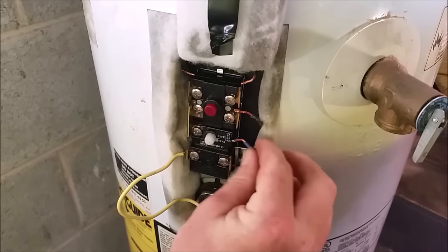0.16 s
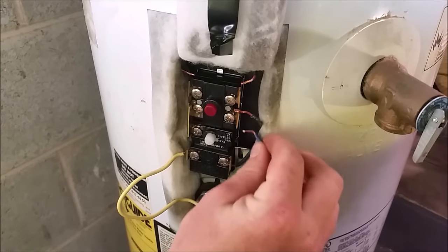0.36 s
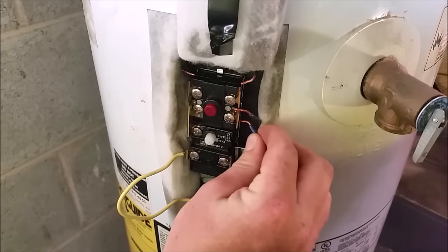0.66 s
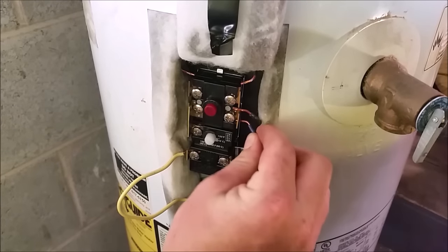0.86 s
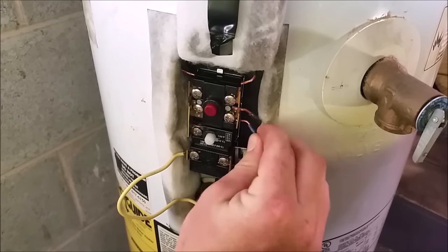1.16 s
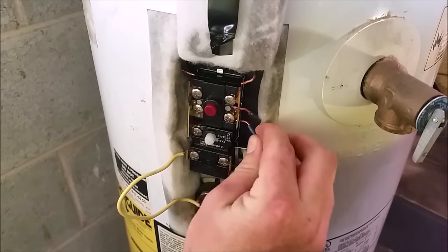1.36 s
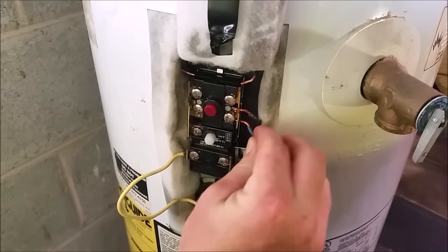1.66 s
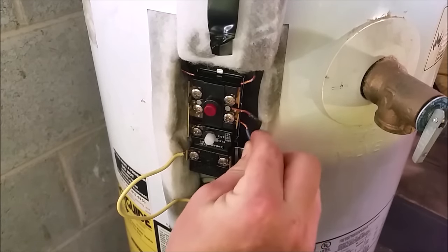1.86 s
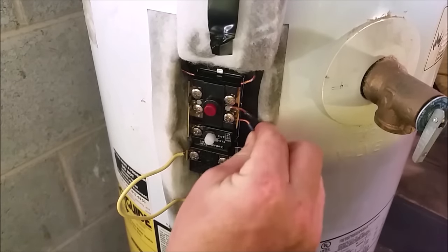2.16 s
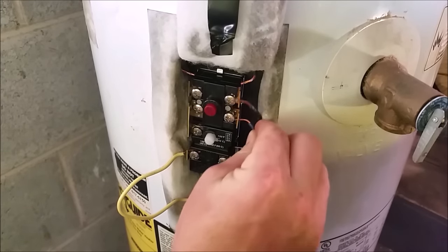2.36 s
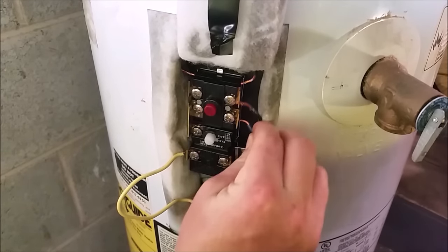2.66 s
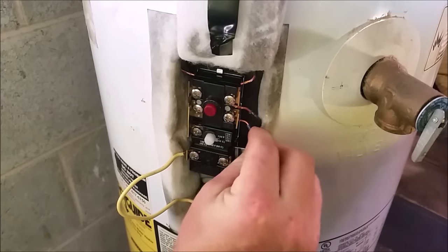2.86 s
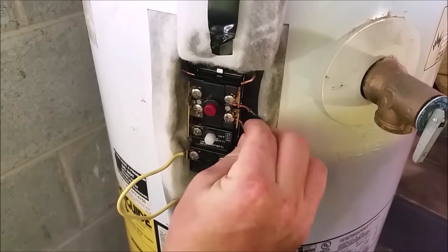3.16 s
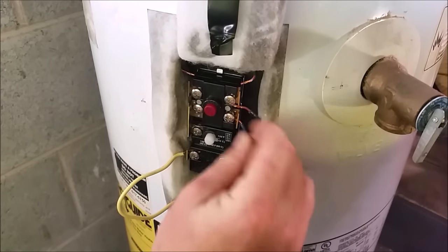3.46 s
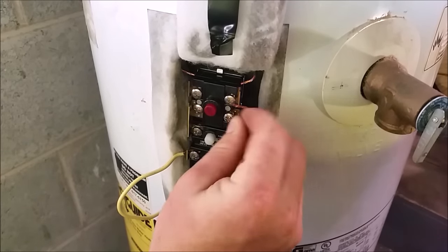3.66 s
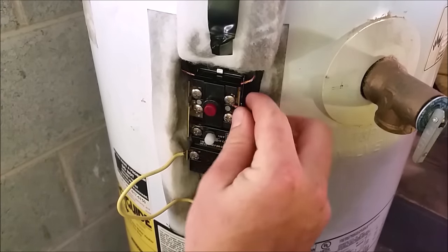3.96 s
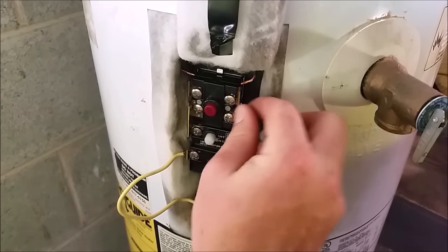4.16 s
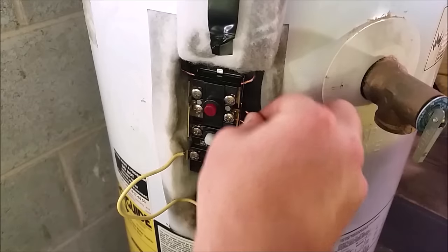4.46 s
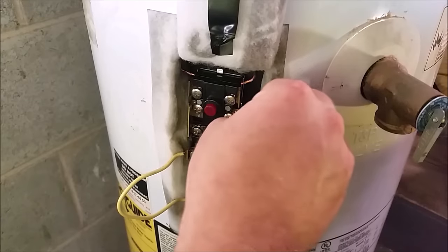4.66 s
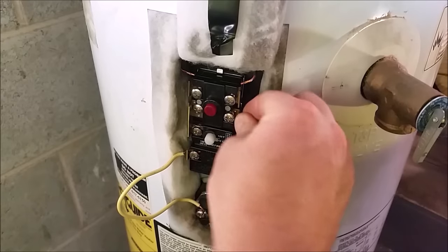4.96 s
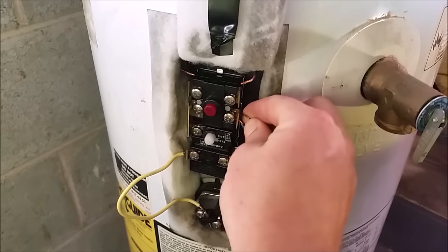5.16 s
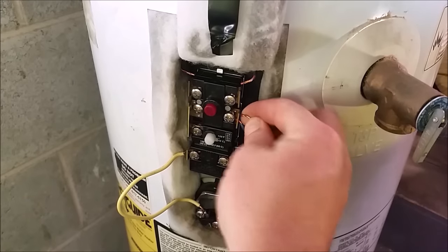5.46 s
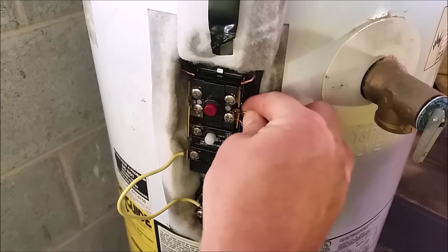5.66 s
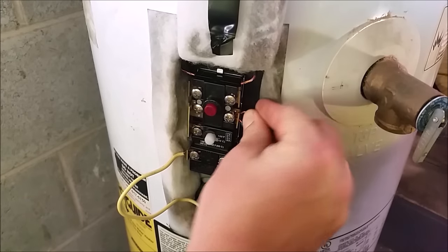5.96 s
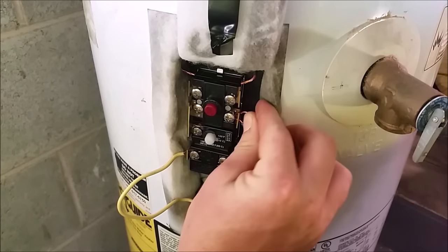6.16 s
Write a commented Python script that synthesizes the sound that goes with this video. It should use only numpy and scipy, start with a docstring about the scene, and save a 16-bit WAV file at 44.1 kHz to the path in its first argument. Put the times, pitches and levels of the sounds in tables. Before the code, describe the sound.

Fingers fiddle with stiff wires on metal terminal screws, giving sharp clicks, hollow plastic knocks and soft rubbing over a low wavering indoor hum.

```python
"""Fingers bend stiff wires on the terminal screws of a water heater's thermostat, close to the microphone.
Soft knocks and skin rubbing open; wire ends start to snap off the screws (noise crack, ringing modes) at 0.7 s.
The loudest snaps and knocks of plastic housing on steel jacket (damped modes, sagging thud) fall at 2.3-3.2 s.
Rubs and light knocks go on; snaps and thuds return at 5.2-5.6 s, then skids (runs of tiny slips) near 6.1 s.
Behind all of it a small masonry room holds a low wavering hum with rumble, and a thin steady hiss (noise bands)."""
import sys
import numpy as np
from scipy import signal
from scipy.fft import rfft, irfft, next_fast_len
from scipy.io import wavfile
from scipy.ndimage import uniform_filter1d, map_coordinates

SR = 44100
rng = np.random.default_rng(int(sys.argv[2]) if len(sys.argv) > 2 else 0)


def master_out(mix):
    """Clip the mix to full scale and print it as 16-bit PCM to the path in sys.argv[1]."""
    frames = np.transpose(np.atleast_2d(mix))
    ceiling = np.clip(frames, -1, 1)
    pcm = np.round(ceiling * 32767).astype(np.int16)
    wavfile.write(sys.argv[1], SR, pcm)


N = 278271


def amp(db):
    """Decibels to gain."""
    return 10 ** (np.asarray(db) / 20)


def unit(x):
    """Scale to rms 1."""
    return x / np.sqrt(np.mean(x ** 2) + 1e-20)


def along(points, hz):
    """Read (Hz, value) points on a log frequency axis."""
    f, v = np.transpose(points)
    return np.interp(np.log(hz + 1), np.log(f + 1), v)


def curves(rows):
    """One value per sample for each column after the time."""
    s, *columns = np.transpose(rows)
    return [np.interp(np.arange(N) / SR, s, column) for column in columns]


def filtered(x, response):
    """Apply a frequency response to x."""
    n = x.shape[-1]
    fft_len = next_fast_len(n + SR // 8)
    spectrum = rfft(x, fft_len) * response(np.fft.rfftfreq(fft_len, 1 / SR))
    return irfft(spectrum, fft_len)[..., :n]


def noise(spectrum, shape):
    """Noise of rms 1 with the given colour."""
    return unit(filtered(rng.standard_normal(shape), lambda hz: amp(along(spectrum, hz))))


def wobble(rate):
    """Smooth random curve, rate knots a second."""
    knots = rng.standard_normal(int(N * rate / SR) + 4)
    return map_coordinates(knots, [np.arange(N) * rate / SR])


def spread(pair, alike, left_db):
    """Mix two unrelated signals to a pair of correlation alike, left louder by left_db, rms 1."""
    turn = np.arccos(np.clip(alike, -1, 1)) / 2
    mid = np.cos(turn) * pair[0]
    side = np.sin(turn) * pair[1]
    return unit(np.array([(mid + side) * amp(left_db), mid - side]))


def add(track, s, sound):
    """Mix a sound into a track at time s."""
    start = max(round(s * SR), 0)
    part = track[..., start:start + sound.shape[-1]]
    part += sound[..., :part.shape[-1]]


def fade(t, attack, t60):
    """Quick rise times exponential decay of 60 dB in t60 seconds."""
    return (1 - np.exp(-t / attack)) * np.exp(-np.log(1000) * t / t60)


def ring(modes, t, attack, detune, pitch=1):
    """Damped modes; each contact point gives them new strengths and slightly new pitches."""
    hz, db, t60 = np.transpose(modes)[:, :, None]
    size, shift, phase = rng.standard_normal((3, len(modes), 1))
    mode_hz = pitch * hz * (1 + detune * shift)
    waves = np.sin(2 * np.pi * (mode_hz * t + phase))
    gains = amp(db + 1.8 * size)
    return np.sum(gains * waves * fade(t, attack, t60), axis=0) / np.linalg.norm(gains)


# Decay of the room tail. Each row: frequency in Hz, t60 in s.
ROOM_T60 = [(200, 0.35), (1000, 0.25), (5000, 0.59), (15000, 0.22)]
ECHO_LUMP_DB, ECHO_MERGE_S = 7, 0.042  # initial unevenness of the echoes, time constant of its decay


def in_room(pair, wet_db):
    """Add a diffuse tail from the block walls, different in each channel."""
    hz, t, z = signal.stft(rng.standard_normal((2, SR // 2)), SR, nperseg=256)
    decay = fade(t, 0.0006, along(ROOM_T60, hz)[:, None])
    tail = signal.istft(z * decay, SR, nperseg=256)[1]
    # first echoes stand apart, from nearby surfaces, then merge
    lumps = unit(uniform_filter1d(rng.standard_normal(tail.shape), SR // 1500, axis=1))
    merge = np.exp(-np.arange(tail.shape[1]) / SR / ECHO_MERGE_S)
    tail = tail * amp(ECHO_LUMP_DB * lumps * merge)
    wet = signal.fftconvolve(pair, tail / np.linalg.norm(tail[0]), axes=1)
    return pair + amp(wet_db) * wet[:, :pair.shape[-1]]


# Wire ends snapping off screws. Each row: start in seconds, relative level in dB, sharpness in dB,
# pitch of the free wire end in Hz, its ring over the crack in dB.
SNAPS = [(0.715, -61, 2, 7100, -3), (0.811, -63.5, -13, 7900, -7), (0.915, -66, -6, 6900, 3),
         (1.018, -41, 14.5, 11500, -12), (1.048, -51, 12.5, 6950, 1), (1.231, -43.5, 9.5, 11700, 0),
         (1.358, -60, 12, 7010, -16), (1.9659, -73, 7, 8650, 8), (2.025, -63, -5, 7500, -4),
         (2.043, -66, 3, 7200, -4), (2.1954, -62.5, 4, 11200, -3), (2.3099, -34.5, 7, 3880, 4.5),
         (2.3113, -41, 2, 5160, 8), (2.3149, -41, -3, 5150, 4), (2.631, -52, 5, 7200, -6),
         (2.688, -60.5, 8.5, 11380, -10), (2.8965, -57.5, 0, 7600, -16), (2.9833, -32.5, 9.5, 5140, -9),
         (3.104, -38, 4, 5040, 8.5), (3.1179, -32.5, 5, 5080, 4), (3.133, -48.5, 2, 7190, -1),
         (3.15, -49, 9, 11000, -8), (3.165, -56, 4, 6640, -7), (3.511, -64, 4, 8500, -1),
         (4.237, -68, 4, 7800, -7), (4.479, -66, 19, 11600, -4), (4.8967, -56, -6, 7190, -7),
         (5.2465, -60, -6, 7000, -7), (5.3946, -53, -2, 6730, -10), (5.4023, -54, 0, 7400, -9),
         (5.4062, -44, -8, 4880, 2), (5.4155, -46.5, 3.5, 2450, 1.5), (5.576, -63, 8, 7160, -7),
         (5.8555, -63, 0, 7220, -1), (6.189, -67, 6, 7850, -3), (6.1952, -64, 6, 7360, -1)]


def clicks():
    """Every snap of a wire end off its screw."""
    out = np.zeros((2, N))
    for s, db, sharp_db, wire_hz, wire_db in SNAPS:
        add(out, s, click(db, sharp_db, wire_hz, wire_db))
    return out


# Colour of the crack before sharpness. Each row: frequency in Hz, relative level in dB.
CRACK_SPECTRUM = [(500, 9), (2000, -6), (2800, -2), (4500, 4), (6300, -5), (7400, -5), (8800, -3),
                  (10000, -5.5), (11200, 3.5), (12500, -1.5), (16000, 4.5)]
# Wire end and screw. Each row: mode in Hz, relative level in dB, t60 in s.
SCREW_MODES = [(2460, -20, 0.11), (2960, -10, 0.029), (3720, 0.5, 0.022), (3940, -14, 0.068),
               (4440, -10, 0.031), (4800, -4.5, 0.032), (5140, 2, 0.019)]
# Bright overtones of the bare copper. Each row: mode in Hz, relative level in dB, t60 in s.
COPPER_MODES = [(6760, -3, 0.046), (7170, -1, 0.049), (7800, -1, 0.044), (8050, -10.5, 0.05),
                (10070, -25, 0.045), (10900, -2.5, 0.032)]
SCREW_DB, SCREW_LOSS_DB_PER_DB = -0.5, 1  # screw ring over the crack, its loss per dB of sharpness


def click(db, sharp_db, wire_hz, wire_db):
    """Wire end lets go: crack of a few ms, short metal ring, scatter off hand and jacket."""
    t = np.arange(SR // 3) / SR
    # sharper contact: more top octave, less screw ring
    colour = [(hz, level + np.interp(hz, [8000, 13000], [0, sharp_db - 12.5]))
              for hz, level in CRACK_SPECTRUM]
    # wire chatters over the thread, so the scatter is uneven
    chatter = unit(amp(10.0 * noise([(300, -12), (900, 9), (2000, -52)], len(t))))
    scatter = amp(-14.5) * chatter * fade(t, 0.0016, 0.11)
    crack = noise(colour, (2, len(t))) * (fade(t, 0.00042, 0.015) + scatter)
    overtones = amp(-13.5) * ring(COPPER_MODES, t, attack=0.00071, detune=0.0011)
    screw_gain = amp(SCREW_DB - SCREW_LOSS_DB_PER_DB * sharp_db)
    screw = screw_gain * ring(SCREW_MODES, t, attack=0.0009, detune=0.0088)
    # free end's pitch depends on where the fingers hold it
    wire = amp(wire_db) * np.sin(2 * np.pi * wire_hz * t) * fade(t, 0.001, 0.016)
    return amp(db + 1.0) * (in_room(crack, wet_db=-10.0) + wire + overtones + screw)


# Pushes and slips that shake the housing. Each row: start in seconds, relative strength in dB,
# hardness in dB over the strength, thud in dB over the strength, contact pitch in Hz, thud t60 in s.
HOUSING_KNOCKS = [(0.195, -62, 2, -3, 1140, 0.05), (0.641, -61, -3, -6, 1080, 0.05),
                  (1.004, -61.5, -2, 16, 800, 0.029), (1.677, -70.5, 15, 29.5, 1020, 0.026),
                  (1.719, -76, 18.5, -10, 1220, 0.032), (1.993, -59.5, 13, -3, 1100, 0.03),
                  (2.003, -64, 14, 12, 1200, 0.03), (2.012, -55.5, 14, 16, 1120, 0.024),
                  (2.024, -56.5, 17, 22, 1110, 0.021), (2.042, -60.5, 18, 13, 1150, 0.025),
                  (2.204, -67.5, 19, 8, 820, 0.06), (2.291, -58.5, 12, -2, 1150, 0.038),
                  (2.3103, -51.5, 13, 4, 900, 0.051), (2.319, -51.5, 16.5, 9, 980, 0.16),
                  (2.334, -58, 4, 11, 560, 0.18), (2.361, -51.5, 2, -1, 981, 0.081),
                  (2.716, -57.5, 15, -8, 810, 0.05), (2.984, -54.5, 10, -1, 1090, 0.06),
                  (3.107, -50, 4, -12, 1100, 0.05), (3.1215, -52, 13, -18, 1860, 0.05),
                  (3.1245, -47.5, 14, -22, 1270, 0.043), (3.131, -50, 14.5, -14, 1100, 0.073),
                  (3.3, -55.5, 7.5, 0, 740, 0.05), (3.351, -53, 4, -12, 1124, 0.045),
                  (3.462, -58.5, 5, -4, 907, 0.05), (3.512, -56.5, 4, -1, 752, 0.09),
                  (3.69, -63, 6, -5, 744, 0.051), (3.808, -66, 11, -6, 1270, 0.05),
                  (4.017, -64, 12.5, -4, 1000, 0.045), (4.235, -70, 14, -8, 1120, 0.04),
                  (4.555, -57, 7, -2, 710, 0.05), (4.89, -59, -9, 6, 905, 0.06),
                  (4.995, -67, 8, -3, 900, 0.05), (5.022, -67.5, 9, 0, 990, 0.05),
                  (5.244, -58, 16, -6, 1050, 0.054), (5.261, -55.5, -3, -3, 970, 0.078),
                  (5.408, -60, 12, 10, 1120, 0.1), (5.414, -55, 8, 5, 840, 0.22),
                  (5.428, -48.5, -5, 1.5, 588, 0.25), (6.049, -58, -13, 4, 930, 0.067)]


def knocks():
    """Single pushes and slips against the housing."""
    out = np.zeros((2, N))
    for s, db, hard_db, thud_db, contact_hz, thud_s in HOUSING_KNOCKS:
        add(out, s, knock(db, hard_db, thud_db, contact_hz, thud_s))
    return out


# Colour of the dead blow. Each row: frequency in Hz, relative level in dB.
BLOW_SPECTRUM = [(150, -13), (400, 2.5), (650, -6), (1200, -2), (1600, -5), (2100, -22.5), (4000, -15.5),
                 (8000, -46)]
# Colour of the slower boom. Each row: frequency in Hz, relative level in dB.
BOOM_SPECTRUM = [(200, -40), (430, 2.5), (600, 0), (850, -0.5), (1400, -17), (2200, -20), (5000, -38.5)]
# Steel jacket under the housing. Each row: mode in Hz, relative level in dB, t60 in s.
JACKET_MODES = [(306.6, -1, 0.19), (383.4, -4.5, 0.39), (447.6, 1, 0.3), (509, -3, 0.25), (586.6, 6, 0.26),
                (870, -8.5, 0.09), (1007, -12, 0.17), (1095, -7, 0.17), (1306, -5.5, 0.14),
                (1610, -15.5, 0.15)]
CONTACT_SCATTER = 0.025  # relative spread of the housing's pitches
THUD_HZ, THUD_SAG_HZ, THUD_SAG_S = 295, 108.4, 0.018  # final pitch, extra at start, settling time constant


def knock(db, hard_db, thud_db, contact_hz, thud_s):
    """Plastic housing knocks dead, steel jacket answers deeper, thud sags as the push relaxes."""
    t = np.arange(SR // 2) / SR
    blow = amp(-7.5) * noise(BLOW_SPECTRUM, (2, len(t))) * fade(t, 0.00089, 0.046)
    housing_modes = [(1, 0, 0.031), (1.27, -1, 0.014)]  # ratio to contact_hz, dB, t60 s
    plastic = amp(-2.5) * ring(housing_modes, t, attack=0.00023, detune=CONTACT_SCATTER, pitch=contact_hz)
    boom = noise(BOOM_SPECTRUM, (2, len(t))) * fade(t, 0.0039, 0.16)
    steel = amp(0.5) * ring(JACKET_MODES, t, attack=0.0014, detune=0.0038)
    cycles = np.cumsum(THUD_HZ + THUD_SAG_HZ * np.exp(-t / THUD_SAG_S)) / SR
    thud = amp(-1.5) * np.sin(2 * np.pi * (cycles + rng.random())) * fade(t, 0.00061, thud_s)
    dry_knock = amp(hard_db) * (blow + plastic) + boom + steel + amp(thud_db) * thud
    return amp(db) * in_room(dry_knock, wet_db=-3.5)


# Strokes of the fingers along the wire. Each row: start in seconds, length in seconds,
# dull rubbing in relative dB, fine scratching in relative dB.
FINGER_STROKES = [(0.376, 0.29, -71, -101), (0.702, 0.61, -73, -89), (1.878, 0.38, -70.5, -87.5),
                  (2.423, 0.52, -69.5, -86.5), (2.998, 0.53, -69.5, -88), (3.463, 0.42, -69.5, -93),
                  (4.353, 0.7, -79.5, -93.5), (5.265, 0.4, -77.5, -93.5), (5.804, 0.2, -69.5, -88),
                  (6.001, 0.33, -67.5, -85.5)]
BUMP_GAP_S, BUMP_DB, BUMP_SCATTER_DB = 0.15, 2, 6.5  # mean spacing, level over rubbing, its spread


def bumps():
    """Fingertips nudge the housing at random during strokes, harder in a firmer stroke."""
    out = np.zeros((2, N))
    for start, length, rub_db, _ in FINGER_STROKES:
        for place in rng.random(round(length / BUMP_GAP_S)):
            db = rub_db + BUMP_DB + BUMP_SCATTER_DB * rng.standard_normal()
            contact_hz = 1000 * np.exp(0.25 * rng.standard_normal())
            bump = knock(db, hard_db=0, thud_db=-14.5, contact_hz=contact_hz, thud_s=0.022)
            add(out, start + place * length, bump)
    return out


SLIP_SCATTER_DB = 0.5


def slip(db, hz, t60):
    """One tiny slip: a few cycles of a damped tone, of random size."""
    t = np.arange(SR // 30) / SR
    gain = amp(db + SLIP_SCATTER_DB * rng.standard_normal())
    return gain * np.sin(2 * np.pi * hz * t) * fade(t, 0.00052, t60)


def skids(rows, rate, pitch_scatter, rise, t60):
    """Dense uneven runs of slips swell and fade; pitch climbs as the contact speeds up."""
    out = np.zeros((2, N))
    for start, length, db, hz in rows:
        count = round(length * rate)
        for size, place in zip(rng.standard_normal(count), rng.random(count)):
            slip_hz = hz * np.exp(pitch_scatter * size + rise * (place - 0.5))
            envelope = np.sin(np.pi * place)
            add(out, start + place * length, envelope * slip(db, slip_hz, t60))
    return in_room(out, wet_db=-3.0)


# Fingertips skidding on insulation. Each row: start in seconds, length in seconds,
# relative level of a slip in dB, centre pitch in Hz.
FINGERTIP_SKIDS = [(0.17, 0.06, -63, 1090), (0.64, 0.073, -61, 1160), (1.992, 0.052, -49, 1160),
                   (2.33, 0.067, -52, 700), (3.12, 0.047, -54, 1840), (3.58, 0.16, -60, 716),
                   (3.638, 0.059, -59, 1130), (3.786, 0.06, -58.5, 1340), (4.541, 0.052, -60, 1270),
                   (5.82, 0.18, -72, 1350), (6.04, 0.1, -64, 756), (6.065, 0.066, -54, 1530),
                   (6.185, 0.045, -55, 870), (6.2, 0.15, -60.5, 1500), (6.24, 0.07, -56, 680)]
# Bare copper grazing a screw. Each row: start in seconds, length in seconds,
# relative level of a slip in dB, centre pitch in Hz.
COPPER_GRAZES = [(0.705, 0.046, -67, 7300), (0.77, 0.065, -65, 7700), (0.85, 0.099, -75, 6900),
                 (2.005, 0.038, -64, 7460), (2.185, 0.065, -65, 10450), (2.615, 0.06, -63, 8000),
                 (3.2, 0.17, -84, 7440), (4.36, 0.046, -69, 7600), (4.88, 0.057, -69, 7200),
                 (5.222, 0.02, -66, 7130), (5.56, 0.06, -69, 7200), (6.05, 0.074, -67, 10000)]
SCRAPE_SLIPS_PER_S, GRAZE_SLIPS_PER_S = 320, 550


def scrapes():
    """Fingertips skid on insulation with a faint rising squeak; copper grazes screws in fine grains."""
    fingertip = skids(FINGERTIP_SKIDS, SCRAPE_SLIPS_PER_S, pitch_scatter=0.11, rise=0.2, t60=0.014)
    copper = skids(COPPER_GRAZES, GRAZE_SLIPS_PER_S, pitch_scatter=0.094, rise=0.03, t60=0.0056)
    return fingertip + copper


RUSTLE_PER_S = 49
RUSTLE_DB, RUSTLE_HZ = 6.5, 1003  # skin slips: level over rubbing, median pitch
CRACKLE_DB, CRACKLE_HZ = 17, 7700  # copper slips: level over scratching, median pitch


def rustle():
    """Loose slips all through each stroke: dull ones of skin, fine ones of bare copper."""
    out = np.zeros((2, N))
    for start, length, rub_db, scratch_db in FINGER_STROKES:
        for place in rng.random(round(length * RUSTLE_PER_S)):
            skin_hz = RUSTLE_HZ * np.exp(0.33 * rng.standard_normal())
            copper_hz = CRACKLE_HZ * np.exp(0.14 * rng.standard_normal())
            skin = slip(rub_db + RUSTLE_DB, skin_hz, t60=0.019)
            copper = slip(scratch_db + CRACKLE_DB, copper_hz, t60=0.0039)
            add(out, start + place * length, skin + copper)
    return in_room(out, wet_db=3.0)


STROKE_ATTACK_S, STROKE_RELEASE_S = 0.042, 0.37
REST_RUB_DB, REST_SCRATCH_DB = -70.5, -100  # fingers that only hold the wire, relative


def stroke_gains():
    """Rubbing and scratching gains: strokes rise, hold and die away, power-summed over the rest level."""
    t = np.arange(N) / SR
    power = amp([[REST_RUB_DB], [REST_SCRATCH_DB]]) ** 2
    for start, length, rub_db, scratch_db in FINGER_STROKES:
        corners_s = np.cumsum([0, STROKE_ATTACK_S, abs(length - STROKE_ATTACK_S), STROKE_RELEASE_S])
        shape = np.interp(t - start, corners_s, [0, 1, 1, 0])
        power = power + (amp([[rub_db], [scratch_db]]) * shape) ** 2
    return np.sqrt(power)


# Colours of skin on insulation, of its rasp, and of copper scratching.
# Each row: frequency in Hz, relative level in dB.
SKIN_SPECTRUM = [(150, -19.5), (350, 6), (580, 2.5), (750, -6), (1200, -10.5), (1650, -12), (2300, -18.5),
                 (4000, -14.5), (6000, -49)]
RASP_SPECTRUM = [(600, -14.5), (1100, -2.5), (1600, -3.5), (1900, -5.5), (2400, -12.5), (5000, -34)]
SCRATCH_SPECTRUM = [(2000, 1.5), (5000, 27), (6100, 3.2), (7200, 9), (8500, 0.5), (9800, 4.3),
                    (11500, 10.8), (16000, 6.5)]
RASP_FROM_DB = -56  # rubbing gain at which the rasp equals the dull rubbing


def copper_overtones(hz):
    """Narrow peaks at the copper modes over a flat response."""
    peaks = [amp(db) / (1 + ((hz - mode_hz) / 70) ** 2) for mode_hz, db, _ in COPPER_MODES]
    return 1 + sum(peaks)


def rubbing():
    """Skin sticks and slips on insulation in uneven little surges; bare copper scratches finely."""
    rub_gain, scratch_gain = stroke_gains()
    grip_db = 1.26 * wobble(30)
    skin_noise = spread(noise(SKIN_SPECTRUM, (2, N)), alike=0.025, left_db=3)
    skin = skin_noise * unit(amp(grip_db + 0.86 * wobble(180)))
    # firmer grip rasps more
    firmness = rub_gain / amp(RASP_FROM_DB)
    rasp_noise = spread(noise(RASP_SPECTRUM, (2, N)), alike=0.082, left_db=2)
    rasp = firmness * rasp_noise * unit(amp(grip_db + 1.1 * wobble(250)))
    # scratching excites the same overtones as a snap
    scratch_noise = filtered(noise(SCRATCH_SPECTRUM, (2, N)), copper_overtones)
    scratch = spread(scratch_noise, alike=0.24, left_db=18)
    copper = scratch * unit(amp(grip_db + 1.6 * wobble(700)))
    return amp(5.0) * rub_gain * (skin + rasp) + amp(15.0) * scratch_gain * copper


# Colours of rumble, narrow hiss and faint high air noise. Each row: frequency in Hz, relative level in dB.
RUMBLE_SPECTRUM = [(10, -11.5), (25, 2.5), (55, 8), (85, 6), (130, -6.5), (220, -5.5), (300, -8),
                   (420, -21.5), (700, -26.5), (1500, -32.5), (3000, -46), (6000, -82.5)]
HISS_SPECTRUM = [(2400, -29.5), (3300, -23), (3550, -8), (3900, -2.5), (4250, 3.5), (4600, -0.5),
                 (5000, -6.5), (5450, -13.5), (5800, -25.5), (6200, -78)]
AIR_SPECTRUM = [(6000, -43), (10000, -19), (11500, -6), (14000, -3.5), (15800, 0.5)]
# Room resonances that carry the hum. Each row: centre in Hz, width in Hz.
HUM_RESONANCES = [(101, 8.5), (168, 14.2)]
# Level of the hum and rumble noise bands over time. Each row: time in seconds, then relative levels
# in dB of the lower resonance, the upper resonance and the rumble.
HUM_LEVEL = [(0.0, -51, -47.5, -52.5), (0.26, -54.5, -56.5, -51.5), (0.38, -44.5, -44, -49.5),
             (0.7, -61, -50, -50.5), (0.84, -50.5, -45, -58), (1.12, -56.5, -45, -50.5),
             (1.7, -47.5, -53.5, -52), (1.84, -51, -43.5, -48.5), (2.24, -51.5, -51.5, -49.5),
             (2.5, -54.5, -49, -51.5), (2.82, -47, -46, -48), (3.24, -58.5, -50, -52),
             (3.58, -54.5, -43.5, -53), (4.26, -58.5, -55.5, -51), (4.4, -52, -46.5, -54),
             (4.58, -51, -57.5, -47.5), (4.84, -49, -43.5, -51), (5.04, -51, -55, -52.5),
             (5.46, -52, -46.5, -51), (5.6, -65.5, -56, -54), (5.88, -51.5, -48, -53),
             (6.3, -54, -49, -52.5)]
HUM_WAVER_DB, HUM_WAVER_PER_S = 0.6, 6
HUM_LAG_S = 0.00031  # delay of hum and rumble on the left


def background():
    """Low rumble and two narrow bands of humming noise, their levels wandering; left hiss, faint high noise."""
    *hum_dbs, rumble_db = curves(HUM_LEVEL)
    rumble = spread(noise(RUMBLE_SPECTRUM, (2, N)), alike=0.92, left_db=-1.3)
    low = amp(rumble_db + 3.4 * wobble(6.0)) * rumble
    for (centre_hz, width_hz), db in zip(HUM_RESONANCES, hum_dbs):
        resonance = lambda hz: 1 / (1 + 2 * ((hz - centre_hz) / width_hz) ** 2)
        hum = spread(filtered(rng.standard_normal((2, N)), resonance), alike=0.97, left_db=2.5)
        # level out slow drift; the narrow band still beats quickly by itself
        slow_power = np.abs(uniform_filter1d(np.mean(hum ** 2, axis=0), size=SR // 4)) + 1e-6
        waver = amp(HUM_WAVER_DB * wobble(HUM_WAVER_PER_S))
        low += amp(db) * unit(waver * hum / np.sqrt(slow_power))
    lag_s = np.array([[HUM_LAG_S], [0]])
    low = filtered(low, lambda hz: np.exp(-2j * np.pi * hz * lag_s))
    hiss = amp(-59.0) * spread(noise(HISS_SPECTRUM, (2, N)), alike=0.12, left_db=21.0)
    air = amp(-72.5) * spread(noise(AIR_SPECTRUM, (2, N)), alike=0.066, left_db=-1.0)
    return low + hiss + air


# Left over right for the near contacts. Each row: frequency in Hz, level difference in dB.
LEFT_OVER_RIGHT = [(200, 16), (500, 5.5), (1100, 6), (2200, 16), (4000, 26.5), (8000, 30), (11000, 20),
                   (15000, 5)]


def near_left(hz):
    """Left and right responses: the right is shaded, most of all in the treble; their mean is 1."""
    shade = amp(-along(LEFT_OVER_RIGHT, hz))
    return 2 * np.array([np.ones_like(hz), shade]) / (1 + shade)


def scene():
    """Contacts near the left port, over rubbing and background."""
    contacts = clicks() + knocks() + bumps() + scrapes() + rustle()
    return filtered(contacts, near_left) + rubbing() + background()


TOP_HZ = 15950


def record(dry):
    """The recorder keeps nothing at or above its band limit."""
    return filtered(dry, lambda hz: hz < TOP_HZ)


dry = scene()
out = record(dry)
master_out(out)
```